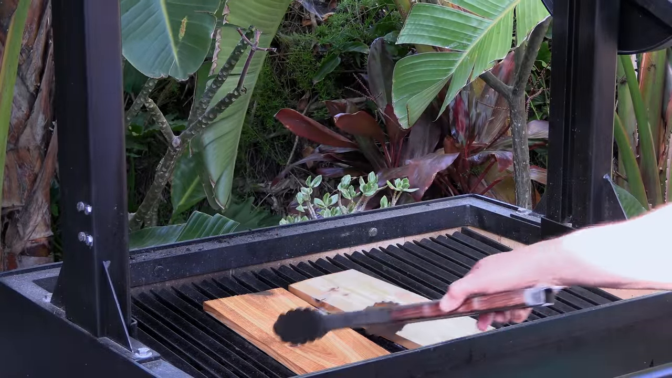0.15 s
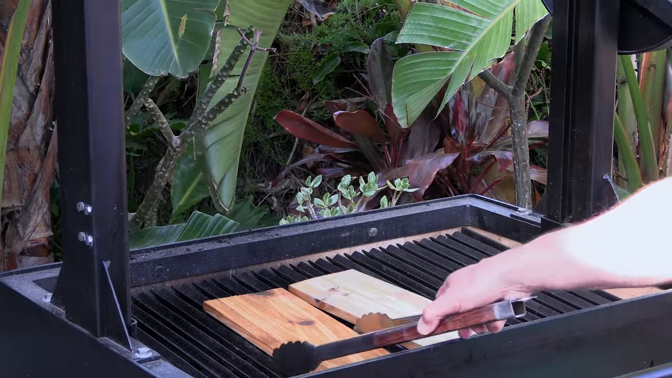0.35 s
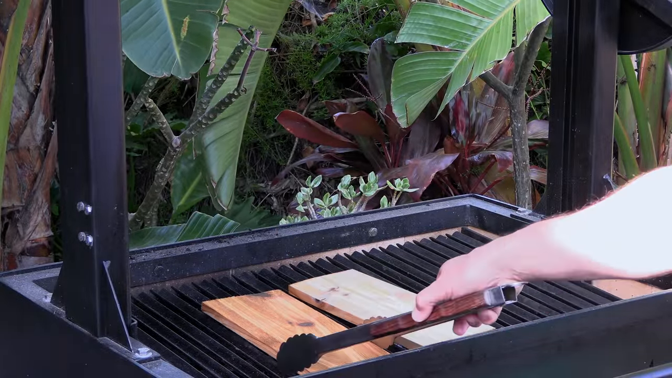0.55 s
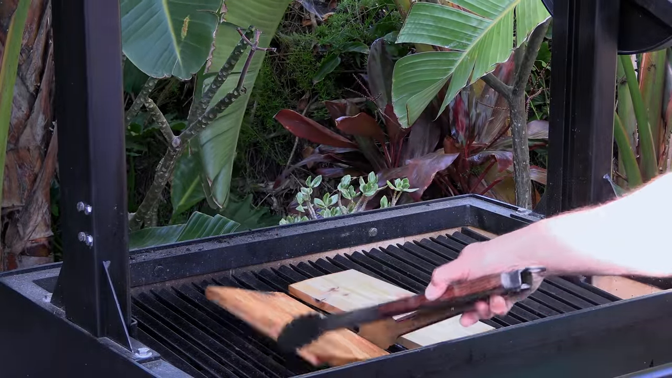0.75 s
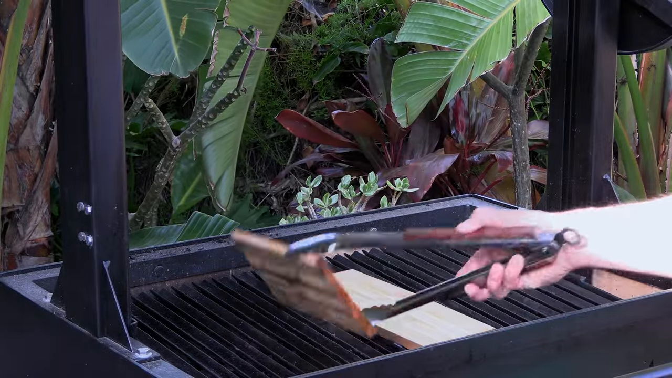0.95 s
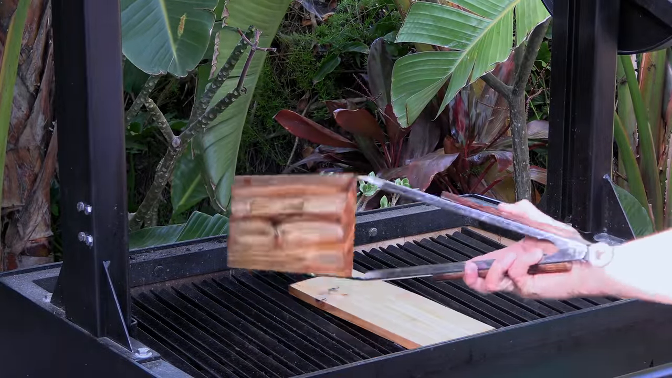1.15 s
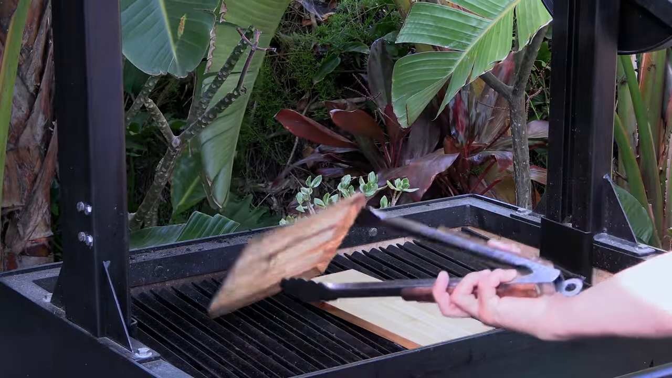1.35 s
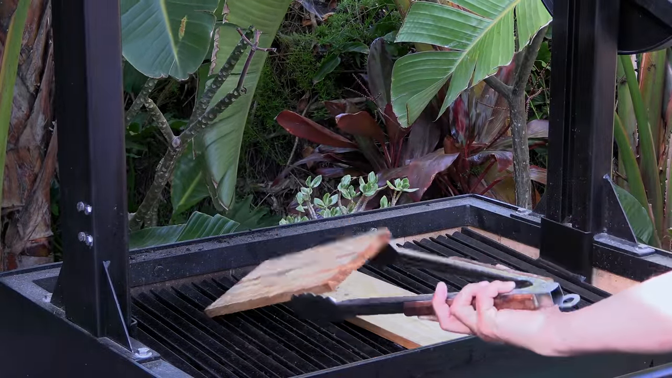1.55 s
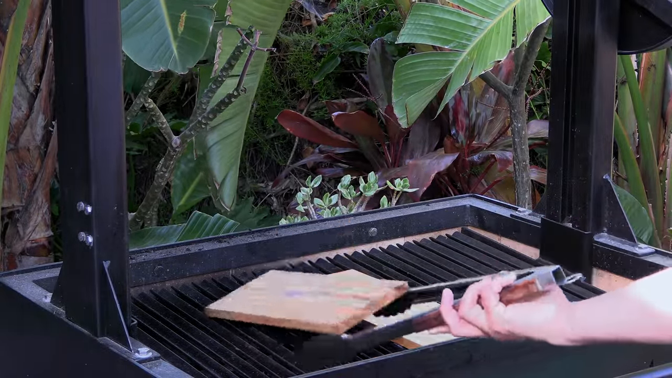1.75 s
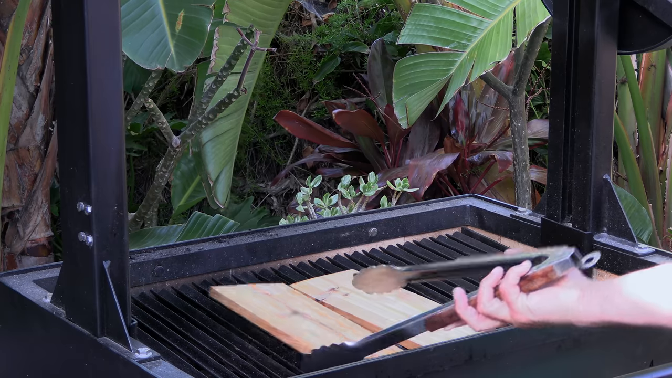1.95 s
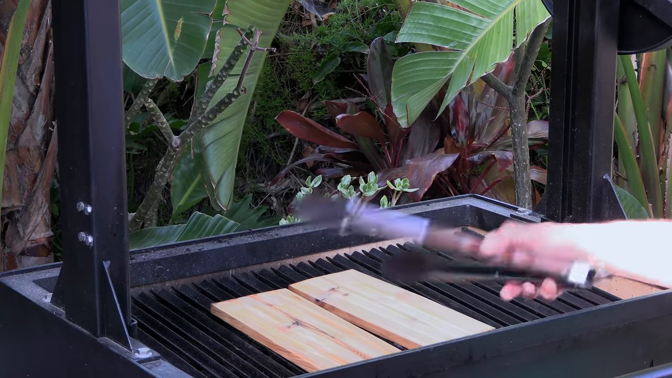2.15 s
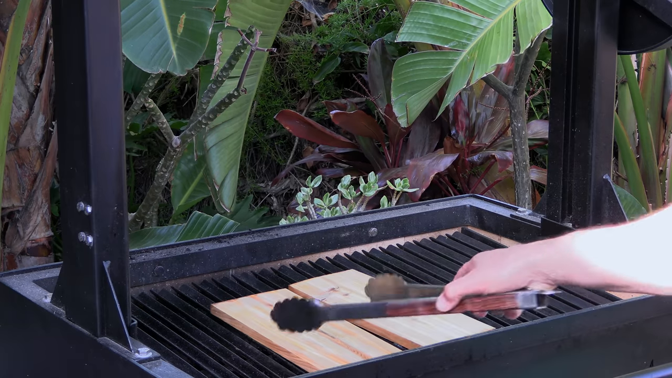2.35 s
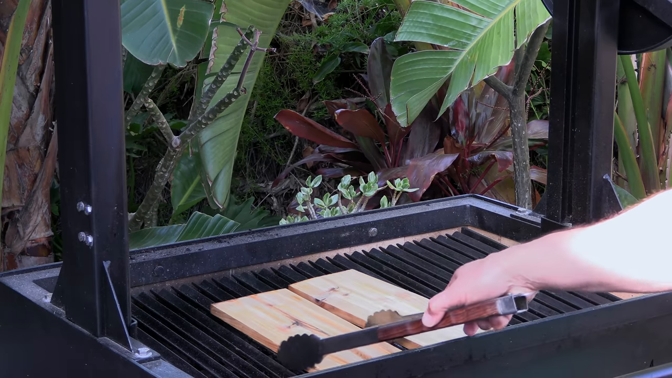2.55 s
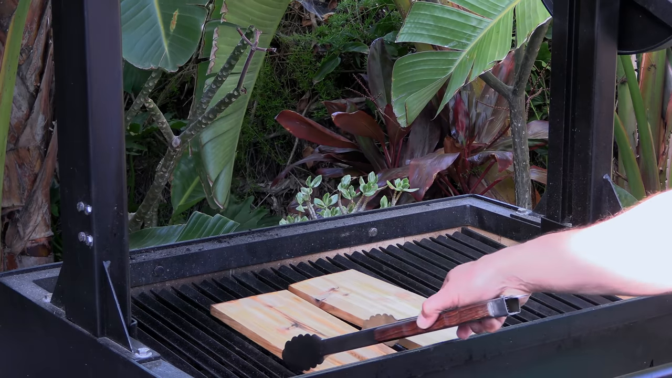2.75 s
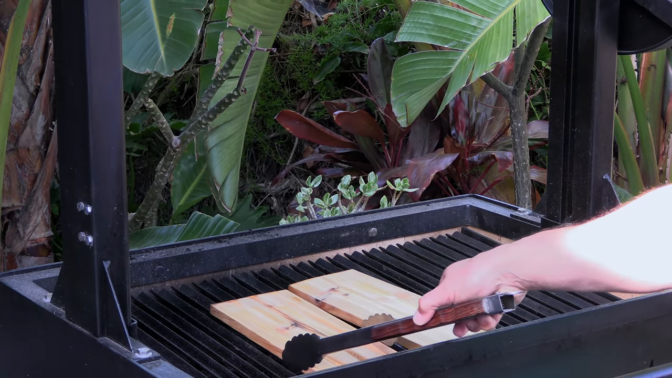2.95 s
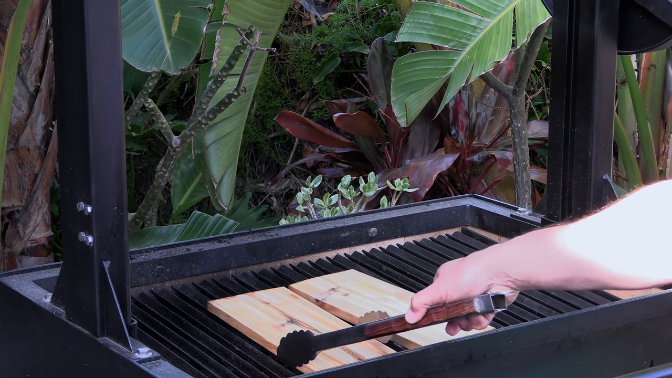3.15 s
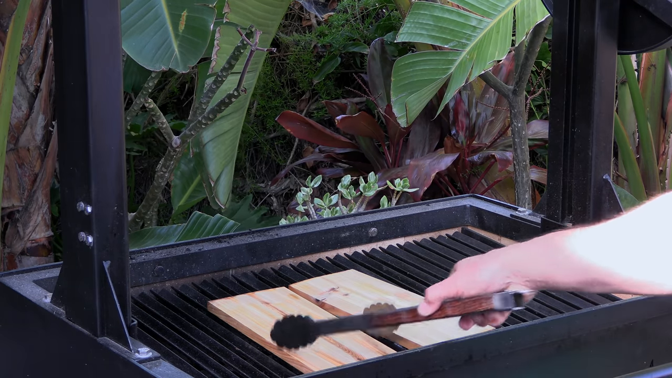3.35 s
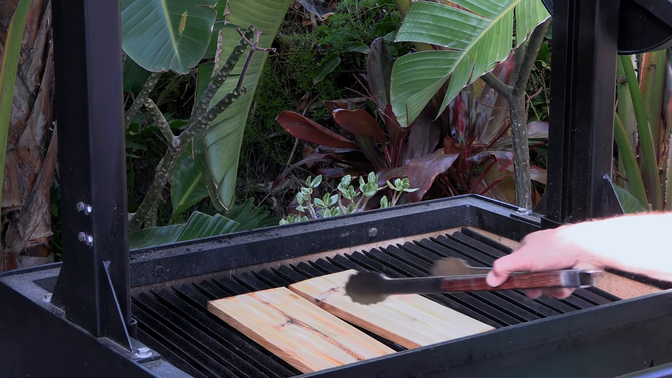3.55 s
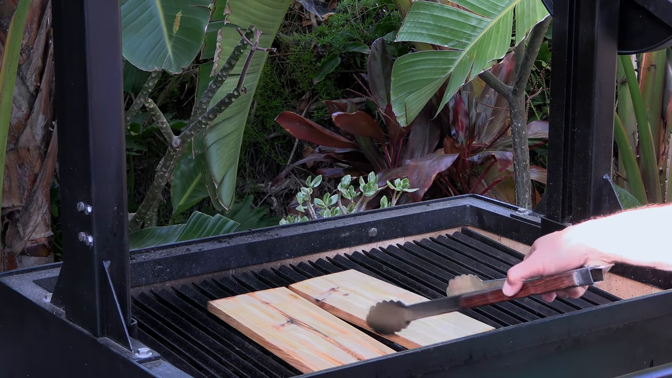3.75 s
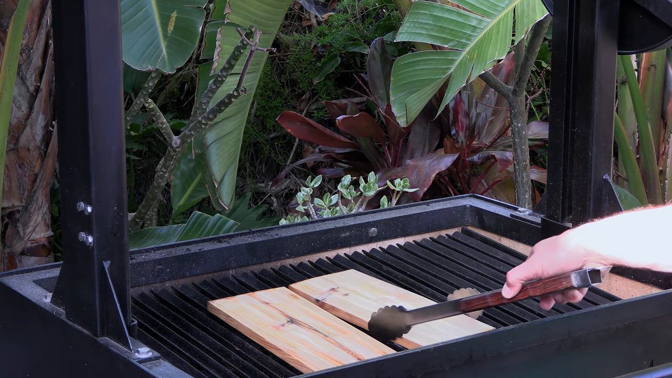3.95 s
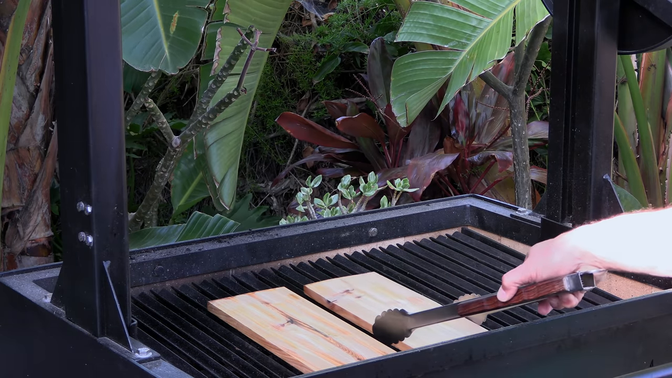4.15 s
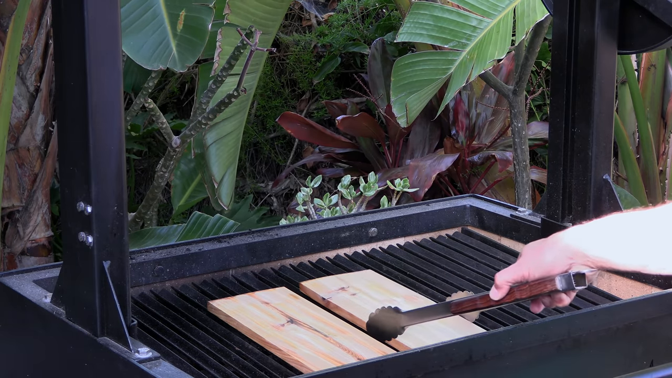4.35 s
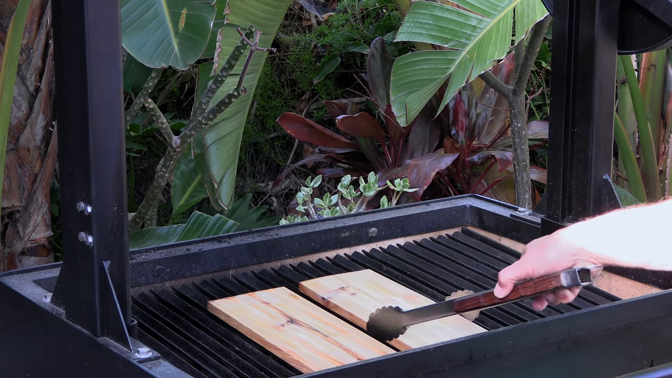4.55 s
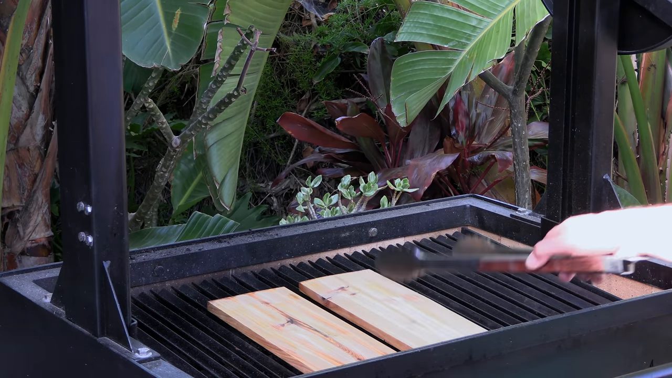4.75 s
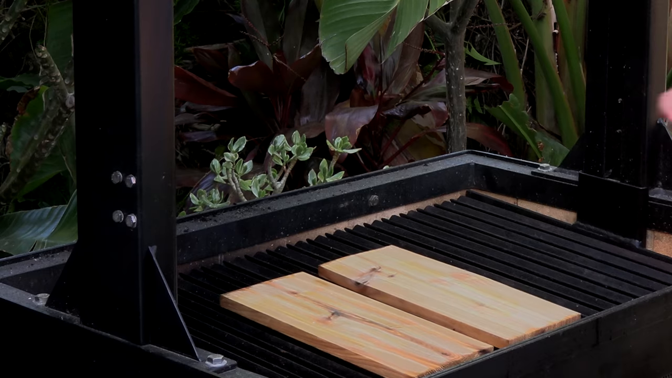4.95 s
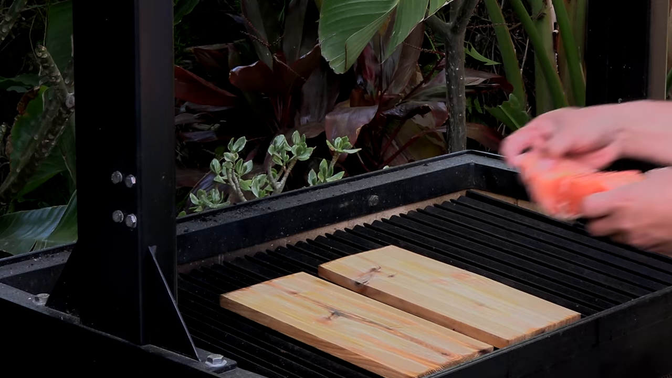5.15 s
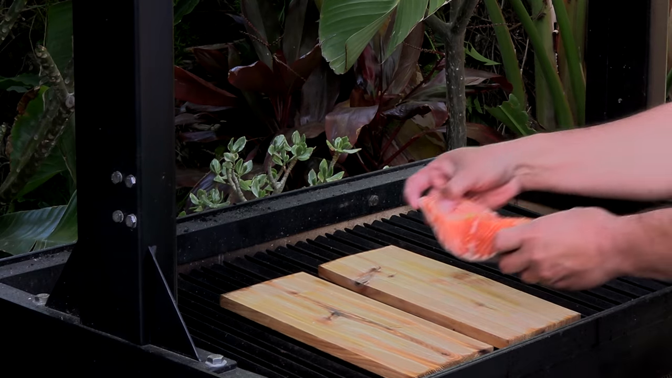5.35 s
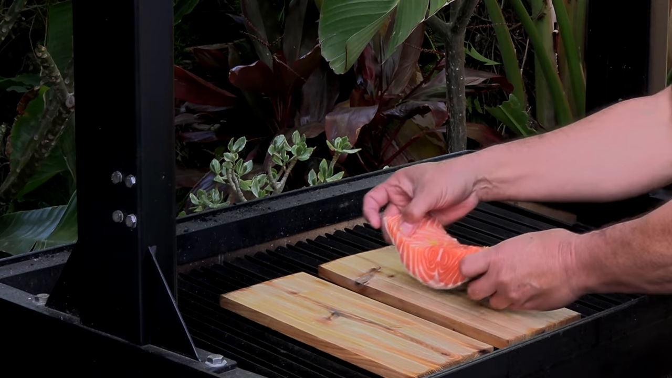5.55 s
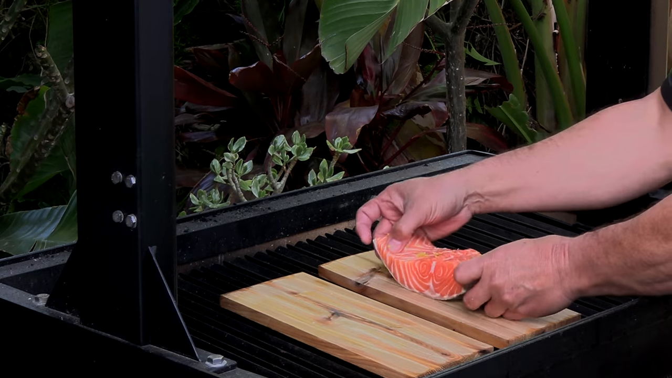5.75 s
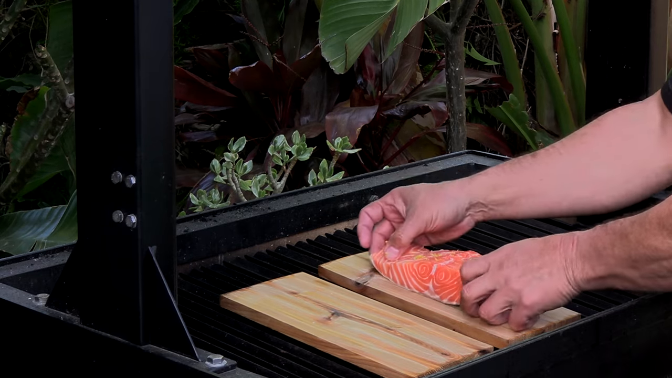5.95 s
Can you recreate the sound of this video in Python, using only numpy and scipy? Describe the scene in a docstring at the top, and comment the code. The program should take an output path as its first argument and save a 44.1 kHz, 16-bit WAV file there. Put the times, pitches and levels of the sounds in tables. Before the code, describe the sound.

Light plank taps, then hard wooden knocks shaking a steel grill grate, a bright metal tong clack and scrape, and embers ticking ever denser outdoors.

```python
"""A low sound is dying away at the start, over distant traffic that rumbles on under leafy hiss; far birds chirp
until past 4 s. Light plank knocks on a steel grill grate come from 0.3 s, the hardest near 2 s, light ones again
to 4.2 s; metal tongs clack and scrape among them, loudest near 2.7 s. Embers and hot wood tick throughout,
densest after 5 s. Contacts are struck decaying modes that also shake the grate and its pan (decaying noise,
lasting modes); scrapes are random slips, ticks noise bursts, the garden noise bands, the far tones narrow noise."""
import sys
import numpy as np
from scipy import signal
from scipy.io import wavfile

SR = 44100
rng = np.random.default_rng(int(sys.argv[2]) if len(sys.argv) > 2 else 0)


def master(y):
    """Save y as 16-bit WAV."""
    cut = np.clip(np.atleast_2d(y).T, -1, 1)
    pcm = np.round(cut * 32767)  # scale
    wavfile.write(sys.argv[1], SR, pcm.astype(np.int16))


N = 268569

# Modes of the steel tongs. Each row: frequency in Hz, relative level in dB, t60 in s before the contact scales it.
TONG_MODES = [(1146.3, -1.5, .04), (1611.6, -1.5, 0.019), (2317.7, -3, 0.026), (3200.5, -8.5, 0.017),
              (4107.3, -6, 0.014), (5520, -15, .03), (6423.3, 0, .02), (7320, -6.5, .06),
              (8922.4, -0.5, 0.038), (9875.6, -3, .03), (10689, -4.5, 0.037), (11700, -12.5, 0.033),
              (13260, -17, .04), (14544, -22, 0.0096)]


def amp(db):
    """Amplitude factor of a level in dB."""
    return 10 ** (np.asarray(db) / 20)


def rms_one(x):
    """Scale to an RMS of 1."""
    return x / np.sqrt(np.mean(x ** 2) + 1e-20)


def in_time(rows):
    """Interpolate each column after the first (seconds) to every sample."""
    s, *columns = np.transpose(rows)
    return [np.interp(np.arange(N) / SR, s, column) for column in columns]


def at_hz(points, hz):
    """Interpolate (Hz, value) points over log frequency."""
    points_hz, values = np.transpose(points)
    return np.interp(np.log(hz), np.log(points_hz), values)


def band(x, low_hz, high_hz):
    """Butterworth band-pass."""
    sos = signal.butter(2, [low_hz, min(high_hz, .45 * SR)], "band", fs=SR, output="sos")
    return signal.sosfilt(sos, x)


def drift(rate_hz):
    """Smooth random curve of RMS 1, one value every 100 samples."""
    r = np.exp(-200 * np.pi * rate_hz / SR)
    noise = rng.standard_normal(N // 100 + 802)
    return rms_one(signal.lfilter([1], [1, -2 * r, r * r], noise)[800:])   # settled part


def ring(clicks, hz, t60):
    """Two-pole resonator: a unit click sets a decaying sine of height 1 ringing."""
    r, w = amp(-60 / (t60 * SR)), 2 * np.pi * hz / SR
    return signal.lfilter([0, np.sin(w)], [1, -2 * r * np.cos(w), r * r], clicks + 1e-18)


def struck(times, modes, blow_db, spread_db, freedom):
    """Every blow (row of blow_db) strikes every mode (column) as a decaying sine; freedom scales the t60."""
    out = np.zeros(N + SR)
    hz, level_db, t60 = np.transpose(modes)
    ring_s = t60 * freedom
    t = np.arange(1 + int(ring_s.max() * SR)) / SR
    decay = np.exp(-np.log(1000) * t / ring_s[:, None])
    signs = (-1) ** np.arange(len(modes))
    luck = rng.standard_normal((len(times), 2, len(modes)))
    for s, row_db, (strength, shift) in zip(times, blow_db, luck):
        gain = amp(row_db + level_db + spread_db * strength) * signs
        pitch_hz = hz * (1 + .006 * shift)     # each blow detunes each mode slightly at random
        rings = decay * np.sin(2 * np.pi * pitch_hz[:, None] * t)
        out[int(s * SR):][:len(t)] += gain @ rings
    return out[:N]


def garden():
    """Low sounds and leaves: third-octave noise bands, each wavering on its own; the treble also flutters together."""
    # Spectrum within each group. Each row: frequency in Hz, relative level in dB per Hz.
    spectrum = [(12, -42), (20, -13), (81, -1.5), (154, -14.5), (187, -13.5), (285, -13.5), (357, -18),
                (485, -20), (678, -20), (873, -19.5), (976, -26.5), (1120, -25), (2460, -32), (12100, -38),
                (16000, -42.5)]
    # Low sound dying away at first, then distant traffic.
    # Each row: time in s, rumble (below 180 Hz) in dB, middle drone in dB.
    low_sounds = [(0.0, -41.5, -56.5), (.12, -54, -64), (.25, -57.5, -64.5), (.5, -55.5, -60),
                  (.7, -57, -65), (1.2, -54.5, -65.5), (2.3, -55, -62.5), (3.3, -56, -67.5),
                  (4.1, -55.5, -64.5), (4.7, -56.5, -68.5), (5.0, -57, -63), (6.09, -56, -65)]
    # Leaves. Each row: time in s, hiss (from 1500 Hz) in dB, treble rustle (from 8 kHz) in dB.
    leaves = [(0.0, -74.5, -79), (1.2, -74.5, -77.5), (2.8, -75.5, -77), (4.0, -73, -74), (4.7, -75.5, -72),
              (5.2, -71, -76.5), (5.6, -73.5, -74), (6.09, -72, -73)]
    treble_flutter_db = 1.5438
    edges_hz, step = 20 * 2 ** np.arange(0, 9.9, 1 / 3), np.arange(N) / 100
    white, groups = rng.standard_normal((2, N)), np.zeros((4, N))
    flutter = drift(9)
    for k, (low, high) in enumerate(zip(edges_hz, edges_hz[1:])):
        hz = np.sqrt(low * high)
        level_db = at_hz(spectrum, hz) + 1.0 * drift(2.3) + 0.98 * drift(14)
        gain = amp(level_db + treble_flutter_db * flutter * (hz > 4000))
        group = int(hz > 180) + int(hz > 1500) + int(hz > 8000)
        groups[group] += np.interp(step, np.arange(len(gain)), gain) * band(white[k % 2], low, high)
    levels_db = in_time(low_sounds) + in_time(leaves)
    return sum(amp(db) * rms_one(group) for db, group in zip(levels_db, groups))


def far_tones(rows):
    """Gliding tones, blurred by distance and leaves into narrow noise bands; each swells and fades as a half sine."""
    out, t = np.zeros(N + SR), np.arange(SR) / SR
    for s, length_s, start_hz, end_hz, level_db, breadth_hz in rows:
        r = np.exp(-np.pi * breadth_hz / SR)
        blur = signal.lfilter([1], [1, -2 * r, r * r], rng.standard_normal((2, 2 * SR)))[:, SR:]
        part = np.clip(t / length_s, 0, 1)
        phase = 2 * np.pi * np.cumsum(start_hz + (end_hz - start_hz) * part) / SR
        tone = rms_one(blur[0] * np.cos(phase) + blur[1] * np.sin(phase))
        out[int(s * SR):][:SR] += amp(level_db) * np.sin(np.pi * part) * tone
    return out[:N]


def motor_whine():
    """A far motor whines faintly: slowly rising narrow noise."""
    # Each row: start in s, length in s, start pitch in Hz, end pitch in Hz, level in dB, breadth in Hz.
    whine = [(.9, 0.6372, 841, 863, -77, 13.6), (1.0, 0.45, 1696, 1733, -81.5, 21.02),
             (4.8, 0.34799, 1074, 1180, -73.5, 50), (5.15, 0.73, 880, 932, -75, 21.04)]
    return far_tones(whine)


def birds():
    """One far bird repeats a falling chirp, another a nearly level note; only time and loudness change."""
    # Calls of each bird. Each row: start in s, level in dB.
    chirps, notes = [(.05, -78.5), (1.16, -75), (2.18, -76), (3.19, -75), (4.05, -74)], [(.2, -75.5), (.96, -78.5), (1.55, -77.5), (2.32, -77), (3.44, -78),
                                     (4.27, -78.5)]
    # Tune of each bird: length in s, start pitch in Hz, end pitch in Hz, breadth in Hz.
    chirp, note = (.075, 3550, 3200, 160), (0.11064, 4450, 4350, 222.2)
    rows = []
    for calls, (length_s, start_hz, end_hz, breadth_hz) in ((chirps, chirp), (notes, note)):
        rows += [(s, length_s, start_hz, end_hz, db, breadth_hz) for s, db in calls]
    return far_tones(rows)


def breathy_patches():
    """Broad treble noise bands of steady pitch that swell and fade."""
    # Each row: start in s, length in s, centre in Hz, level in dB.
    patches = [(.14, 0.2008, 6300, -78.5), (1.219, 0.2959, 6650, -76), (2.43, 0.09556, 6600, -79),
               (3.2, 0.06132, 5470, -78.5), (4.15, 0.0759, 6400, -72), (5.24, .09, 4200, -71.5),
               (5.718, 0.2642, 7328, -75), (5.681, .3, 5499, -74)]
    breadth_hz = 802
    return far_tones([(s, length_s, hz, hz, db, breadth_hz) for s, length_s, hz, db in patches])


def ticks():
    """Embers and hot wood: millisecond coloured noise bursts; random ones come more often as the wood heats.
    The bursts at 1.392 s and 1.441 s are instead the sharp treble clicks of plank knocks."""
    # Each row: start in s, level in dB at its colour, colour in octaves above 1 kHz.
    clear_ticks = [(.0267, -52, 3.176), (0.1294, -57, 2.122), (0.7856, -47, 4.15), (0.7996, -55.5, 3.957),
                   (1.0298, -50.5, 1.103), (1.2696, -53, 1.937), (1.288, -51.5, 1.948),
                   (1.392, -46.5, 1.2284), (1.441, -45.5, 2.874), (1.595, -52, 0.98),
                   (1.6396, -53.5, 1.536), (1.6978, -52, 2.185), (1.7711, -49.5, 3.689),
                   (2.288, -45.5, 1.225), (3.0641, -47, 3.724), (3.1984, -50, .7), (3.3193, -46, 3.671),
                   (3.4281, -45, 3.82), (3.492, -50, 0.54), (3.6755, -46, 3.845), (3.6964, -47, 1.609),
                   (4.2695, -51, 3.93), (4.4176, -49, 0.808), (4.4368, -51.5, 3.509),
                   (4.4718, -48.5, 1.301), (4.5332, -50, 3.725), (4.6317, -51.5, 0.64), (4.7664, -48.5, .8),
                   (4.8226, -50, 0.976), (4.9018, -48, 4.072), (5.014, -49.5, 1.003), (5.0842, -49, 1.521),
                   (5.1515, -46.5, 3.186), (5.1973, -47.5, 2.413), (5.2755, -51, 1.5), (5.34, -43, .9),
                   (5.4091, -52, 2.722), (5.354, -54, 2.61), (5.473, -49.5, 2.136), (5.564, -49, 3.502),
                   (5.6059, -44, 3.836), (5.634, -53.5, 3.53), (5.6576, -54.5, 2.4), (5.696, -42, 2.803),
                   (5.7469, -48.5, 2.203), (5.8258, -49.5, 0.74), (5.8442, -48.5, 2.354),
                   (5.8539, -46.5, 2.367), (5.8644, -51, 3.299), (5.9324, -41.5, 3.432),
                   (5.9933, -41.5, .6)]
    # Each row: low edge in Hz, high edge in Hz.
    tick_bands = [(994, 3360), (3500, 7218.3), (8000, 15700)]
    narrow_db = 4.5   # loss one octave from the colour, growing as the square of the distance
    faint_base_db, decay_s = -62.5, 0.0013
    out, t = np.zeros(N + 300), np.arange(300) / SR
    when, loudness, hue = rng.random((3, 320))
    faint_db = faint_base_db - 3.0 * np.log(loudness + .02)
    faint_ticks = np.c_[when ** .8 * N / SR, faint_db, .3 + 3.7 * hue]
    s, level_db, colour = np.r_[np.array(clear_ticks), faint_ticks].T
    noise = rng.standard_normal((len(s), len(t))) * np.exp(-t / decay_s)
    bursts = 0
    for low, high in tick_bands:
        part = band(noise, low, high)
        part = part / np.abs(part).max(axis=1, keepdims=True)
        away = np.log2(np.sqrt(low * high) / 1000) - colour
        bursts = bursts + amp(level_db - narrow_db * away ** 2)[:, None] * part
    for start, burst in zip(s, bursts):
        out[int(start * SR):][:len(t)] += burst
    return out[:N]


def grate(blows):
    """Grate and pan: many bars at once as noise bands dying at their own rates; a few modes last, the frame shoves."""
    # Dense ring. Each row: frequency in Hz, t60 in s.
    dense_t60 = [(120, 0.8462), (250, 0.5505), (500, 0.3528), (1000, 0.3114), (2000, 0.2158), (4000, 0.25),
                 (8000, 0.0006)]
    # Dense ring. Each row: frequency in Hz, relative level in dB.
    dense_db = [(120, -3), (250, -2), (500, -3), (1000, -5), (2000, -3), (4000, -1.5), (8000, -10.5)]
    # Lasting modes. Each row: frequency in Hz, level in dB, t60 in s.
    bars = [(139.87, -58.5, 0.68), (217.11, -64.5, .4), (342.42, -60.5, .4), (555.68, -58, 0.11),
            (1065.9, -65, 1), (1228.1, -64.5, 0.49)]
    t = np.arange(SR // 2) / SR
    edges_hz = 90 * 2 ** np.arange(0, 7.6, .5)
    tail = 0
    for low, high in zip(edges_hz, edges_hz[1:]):
        hz = np.sqrt(low * high)
        t60 = at_hz(dense_t60, hz)
        envelope = amp(-60 * t / t60) * (1 - np.exp(-t / .003))
        dying = band(rng.standard_normal(len(t)), low, high) * envelope
        tail = tail + amp(at_hz(dense_db, hz)) * dying / np.sqrt(t60 * SR / 14)   # offsets longer decays
    lasting = sum(amp(db) * ring(blows, hz, t60) for hz, db, t60 in bars)
    push = amp(-19.0) * band(np.abs(blows), 25, 110)     # the frame takes each blow as a low shove
    return signal.fftconvolve(blows, tail)[:N] + lasting + push


def scrapes():
    """Tong tips slide on wood: dense uneven slips through short tong modes; each slide swells, holds and fades."""
    # Each row: end of swell in s, swell in s, hold in s, fade in s, low-part level in dB,
    # treble over 5 kHz in dB relative to the low part.
    slides = [(0.521, 0.02458, 0.02003, 0.03822, -54.5, -6.5), (1.872, .003, 0.00206, 0.0465, -44, -20.5),
              (1.918, .03, .002, 0.0567, -58.5, -9), (2.591, .003, 0.0293, 0.0556, -64, -17),
              (2.638, 0.0039, 0.001913, 0.0597, -51, -15), (2.69, .08, 0.02934, 0.0481, -61.5, -5),
              (2.736, .014, 0.00527, 0.06458, -39, -9), (3.925, .04, 0.019, .07, -63.5, -8.5)]
    range_db, slips_per_s = 25, 5000   # span of swell and of fade; mean slip rate
    out = np.zeros(N)
    for peak_s, swell_s, hold_s, fade_s, level_db, treble_db in slides:
        start = int((peak_s - swell_s) * SR)
        t = np.arange(start, int((peak_s + hold_s + fade_s) * SR)) / SR
        chance, size, side = rng.random((3, len(t)))
        heights = amp(-2.5 * np.log(size + 1e-3))
        slips = (chance < slips_per_s / SR) * heights * np.sign(side - .5)
        rings = [amp(db) * ring(slips, hz, 0.082 * t60) for hz, db, t60 in TONG_MODES]
        low = rms_one(sum(rings[:5]) + amp(11.5) * band(slips, 900, 5000))
        high = rms_one(sum(rings[5:]) + amp(13.5) * band(slips, 5000, 14000))
        rising = (peak_s - t) / swell_s
        falling = np.clip(t - peak_s - hold_s, 0, 1) / fade_s
        touching = amp(level_db - range_db * np.maximum(rising, falling))
        out[start:][:len(t)] += touching * (low + amp(treble_db) * high)
    return out


def tongs():
    """Steel on steel or wood: short bright modes, treble share set by the contact. Returns ring and bare blow."""
    # Each row: start in s, level in dB before the ring or blow offset, relative level in dB of modes over 6 kHz.
    clacks = [(0.835, -43, -3.5), (1.8702, -30.5, -31), (1.877, -36.5, -22.5), (1.9184, -46, 0),
              (2.293, -41.5, -6), (2.639, -27, -15), (2.655, -41, -28), (2.68, -41.5, -12),
              (2.709, -44.5, 0.5), (2.7286, -39.5, -22.5), (2.736, -17.5, -11.5), (2.7538, -23.5, -13.5),
              (2.814, -44, -20.5), (2.8448, -48, -10)]
    ring_db, bare_db = -17, -9
    s, level_db, treble_db = np.transpose(clacks)
    bright = np.transpose(TONG_MODES)[0] > 6000
    blow_db = level_db[:, None] + treble_db[:, None] * bright
    steel = struck(s, TONG_MODES, blow_db + ring_db, spread_db=1.5, freedom=1.4)
    clack = struck(s, TONG_MODES, blow_db + bare_db, spread_db=0.0, freedom=.15)
    return steel, clack


def planks():
    """Landing place sets the deep and clear modes, hardness the upper ones. Returns ring and bare blow."""
    # Each row: start in s, level at 700 Hz in dB before mode levels, deep modes in relative dB,
    # hardness as slope above 700 Hz in dB per octave, clear mode in relative dB.
    knocks = [(0.345, -46, -3.5, -8.5, -5), (0.385, -55.5, 12, -8, 1.3566), (0.391, -46.5, -5, -11, 4),
              (0.427, -50, -5.5, -6.5, 0.78), (0.439, -61, 10.5, 1.756, -3.5), (0.451, -59.5, 7.5, -2, -3),
              (0.469, -58.5, 5, -6, -0.6928), (0.539, -53, -5.5, 1.2085, -0.198),
              (0.834, -49.5, -7.5, -1.1576, -4.5), (0.861, -51.5, -19.5, -9, -7.5),
              (1.437, -40, -2, -4.5, -3.5), (1.461, -48.5, 0.82, -9.5, 1.33), (1.837, -57.5, 5.5, -5.5, 4),
              (1.947, -36, 0.1568, -11, -3.5), (1.983, -21, -4, -6.5, -1.5),
              (1.991, -23.5, -3, 1.1632, 8.5), (2.02, -31.5, -9, -11, -8), (2.029, -28.5, -26, -21, 0.8231),
              (2.09, -36.5, 1, -16.5, -5), (2.118, -19, -8.5, -5, 10.5), (2.164, -32.5, 0.3718, -12.5, -9),
              (2.177, -38.5, 0, -15.5, -4), (2.591, -58, -4.5, -2.5, 0.0033),
              (2.736, -52.5, -14.5, 1.9548, 5), (2.756, -51.5, 1.5, 2, 7.5),
              (2.767, -64.5, 19, 4.5, 1.3537), (3.344, -57.5, 3, -12, -5.5),
              (3.865, -52, -11.5, -3.5, 0.0649), (3.91, -54, -13, -3, -3), (3.93, -54.5, -11, -1.5, 0.1126),
              (3.978, -54, 9.5, -7.5, 0.04), (4.009, -68, -8, 2, 2.5), (4.128, -63.5, 4, -0.5, 6.5),
              (4.149, -57.5, 2.5, -3.5, 1.2519), (4.159, -48, 4, -5.5, -3), (4.174, -53.5, 2.5, -8, -3.5)]
    # Each row: frequency in Hz, relative level in dB, free t60 in s.
    plank_modes = [(150, -8, 0.17), (214.25, 1, 0.1), (299.46, 4.5, 0.07), (391.79, 0.5, 0.074),
                   (460.82, -4.5, .08), (544.75, 1, 0.10993), (623.18, -2, 0.11), (680.59, -1.17, 0.096),
                   (813.87, -3.5, 0.069), (1038, -7, .07), (1180, -11, 0.055), (1258, -6, 0.044),
                   (1346.7, -12.5, 0.15), (1515.8, 0.5, 0.062), (1714.9, -1.5, 0.027), (1915, -8.5, 0.036),
                   (2076.6, -6, 0.036), (2300, -6, .03), (2530, -3, 0.019), (2784.7, -3, 0.04),
                   (3020, -7.5, 0.02), (3329, -8.5, 0.026), (3660, -12, 0.021), (4070, -14, 0.015),
                   (4670, -13, .015), (5175, -15, .012), (6665, -22.5, 0.016)]
    deep_hz, middle_hz, clear_hz = 280, 700, 1504
    ring_freedom, bare_freedom = 0.7951, 0.12   # shares of the free t60
    bare_db = 4   # bare blow over the ring
    s, level_db, deep_db, slope_db, clear_db = (c[:, None] for c in np.transpose(knocks))
    hz = np.transpose(plank_modes)[0]
    octaves = np.log2(hz / middle_hz)
    depth = np.clip(octaves / np.log2(deep_hz / middle_hz), 0, 1)
    clear = np.abs(np.log2(hz / clear_hz)) < .1
    blow_db = level_db + deep_db * depth + slope_db * np.clip(octaves, 0, 2.1) + clear_db * clear
    bare_blow_db = blow_db - 0.41 * clear_db * clear + bare_db
    s = s[:, 0]
    wood = struck(s, plank_modes, blow_db, spread_db=2.5, freedom=ring_freedom)
    knock = struck(s, plank_modes, bare_blow_db, spread_db=2.5, freedom=bare_freedom)
    return wood, knock


def scene():
    """All contacts shake the grate; ticks and the garden are added."""
    wood, knock = planks()
    steel, clack = tongs()
    slide = scrapes()
    shaken = grate(knock + amp(-10.5) * wood + amp(-2.5) * clack + amp(-11) * slide)
    contacts = wood + amp(-11.0) * knock + steel + clack + slide + shaken
    far = birds() + breathy_patches() + motor_whine() + garden()
    return (contacts + ticks() + far)[None]


def record(dry):
    """A steep low-pass cuts the top."""
    stop_hz = 16250   # 50 dB down from here
    return signal.sosfilt(signal.cheby2(14, 50, stop_hz, fs=SR, output="sos"), dry)


dry = scene()
out = record(dry)
master(out)
```